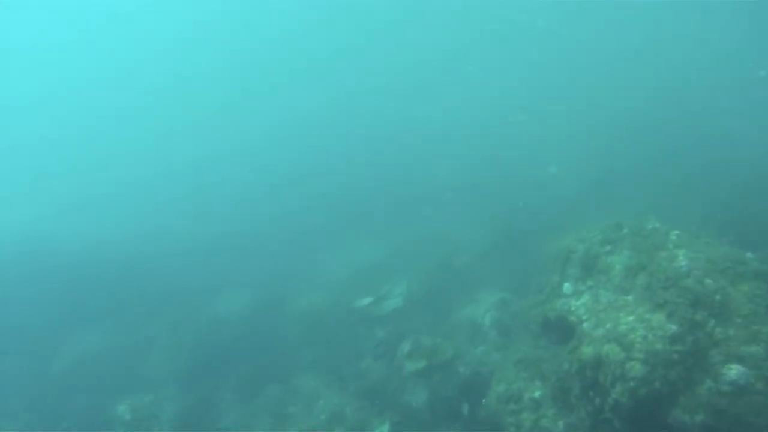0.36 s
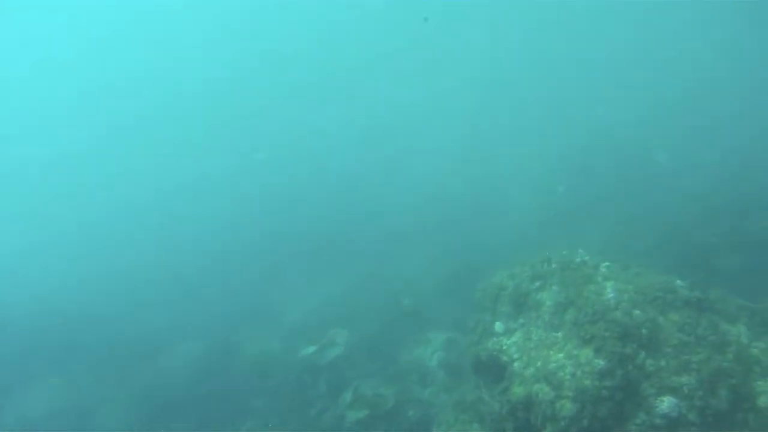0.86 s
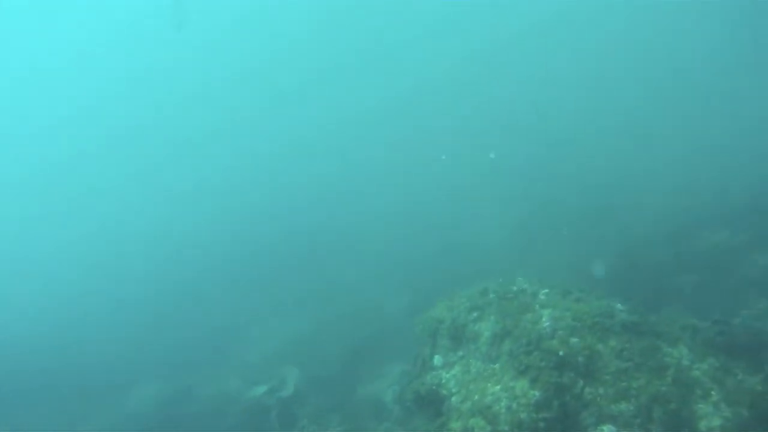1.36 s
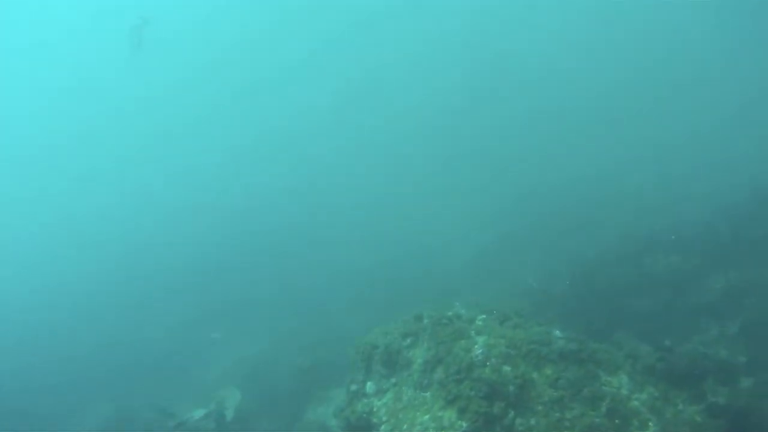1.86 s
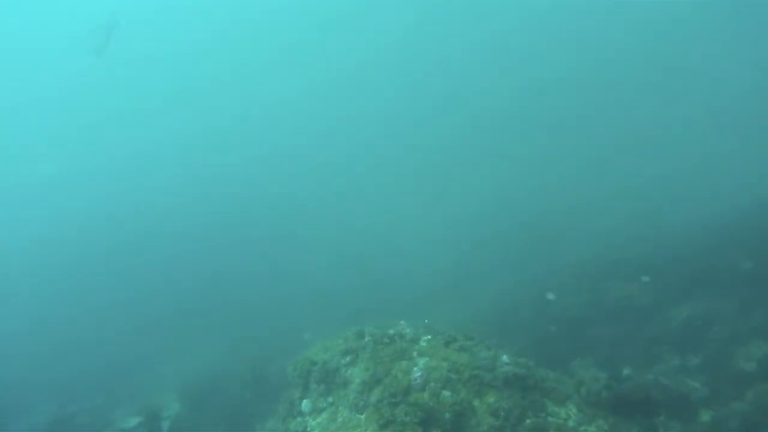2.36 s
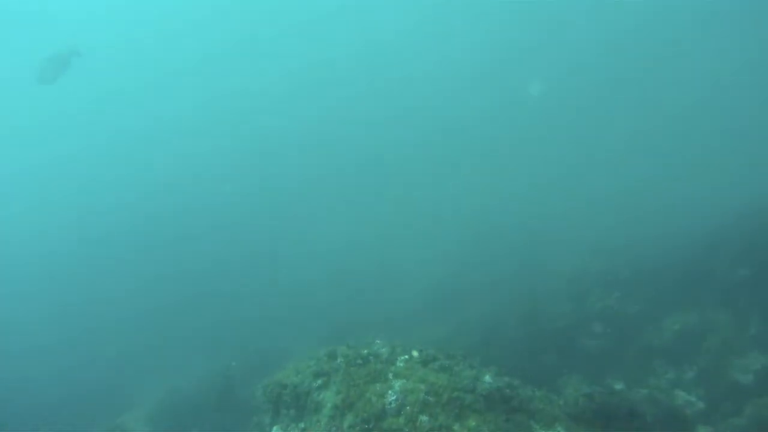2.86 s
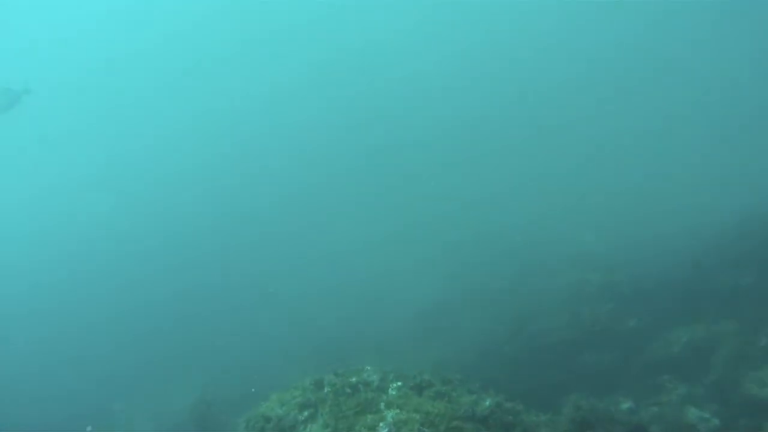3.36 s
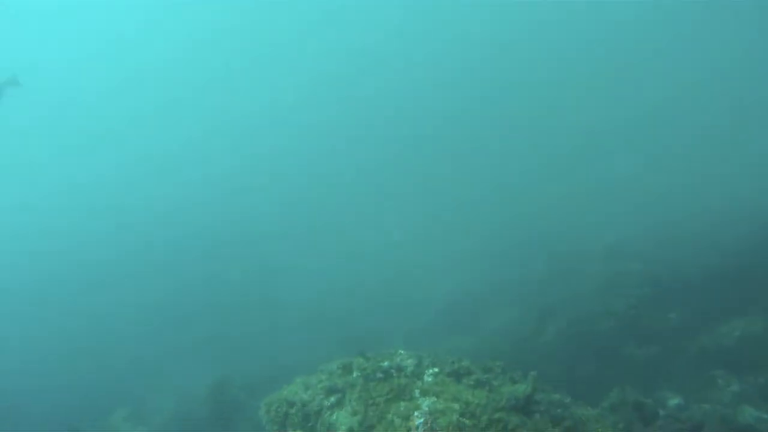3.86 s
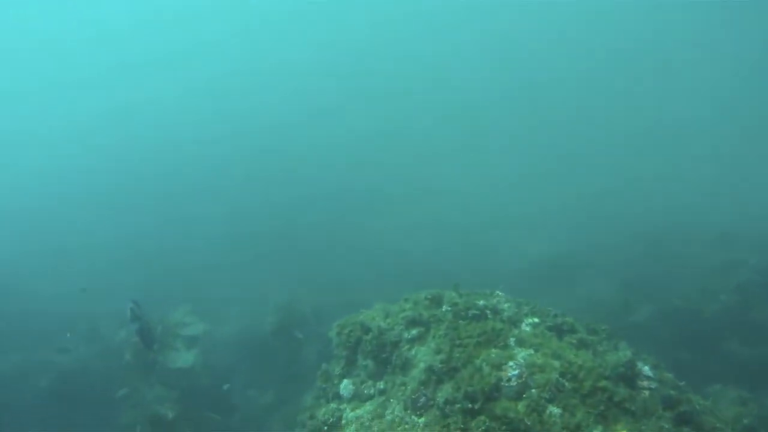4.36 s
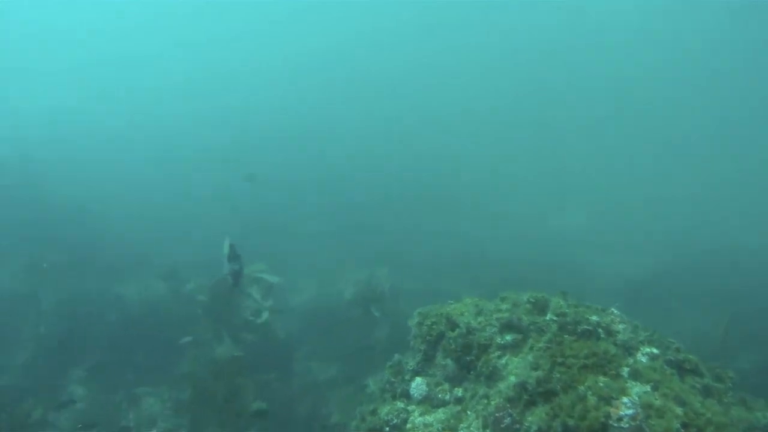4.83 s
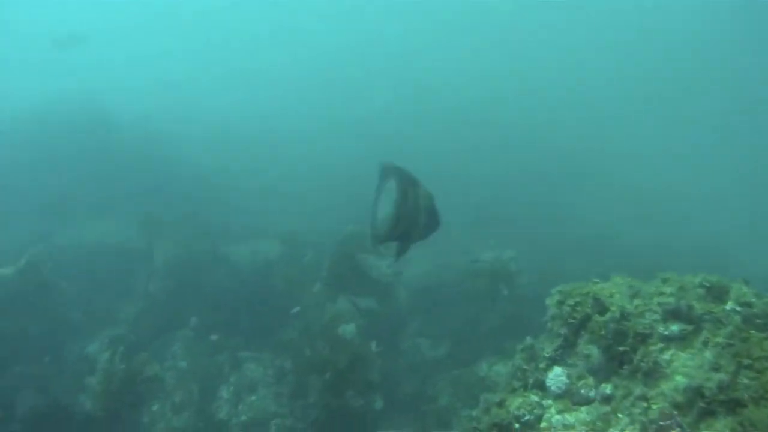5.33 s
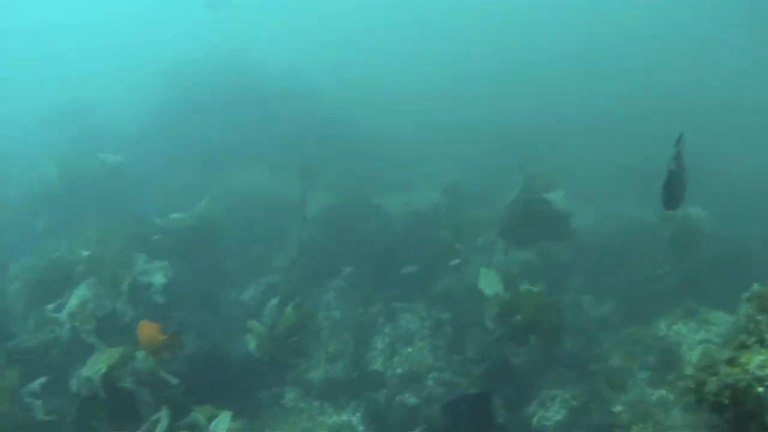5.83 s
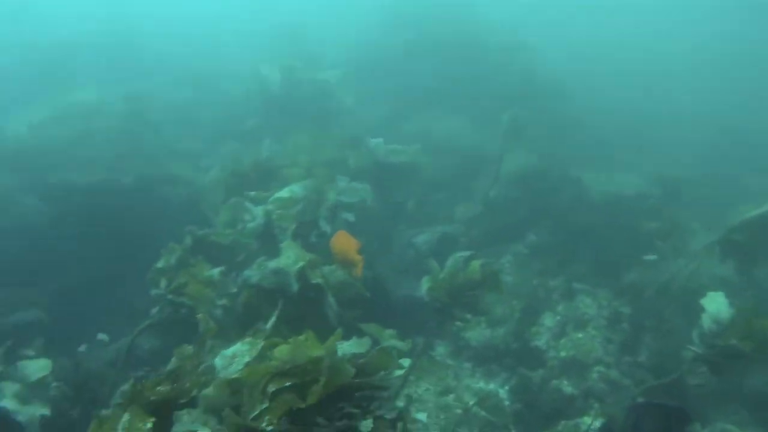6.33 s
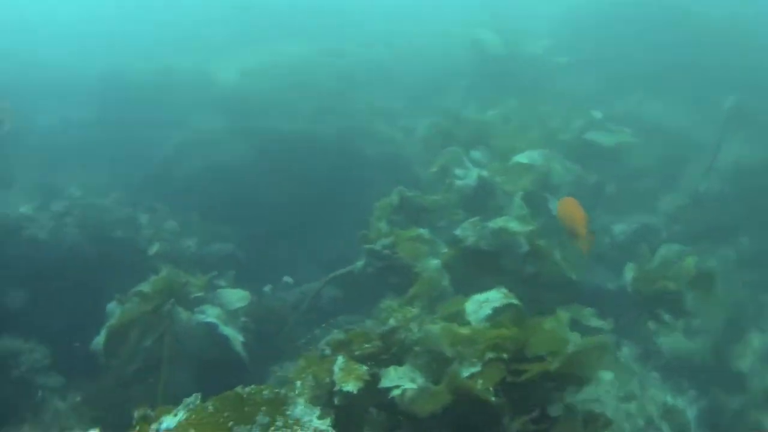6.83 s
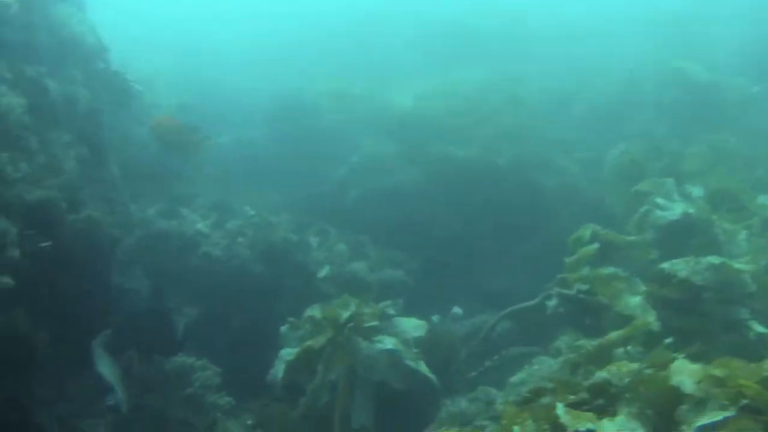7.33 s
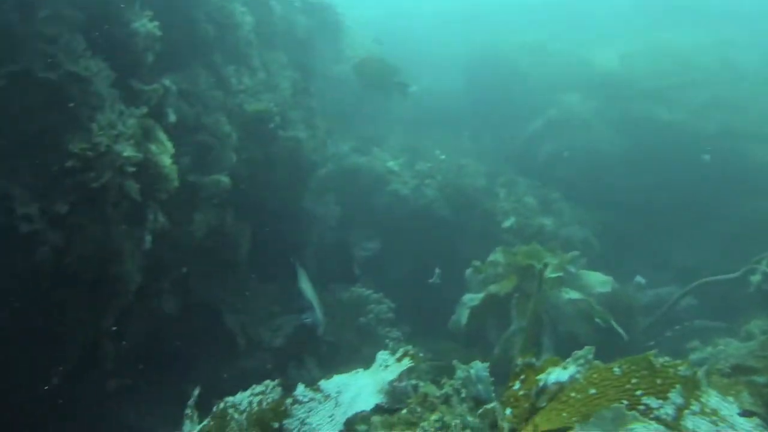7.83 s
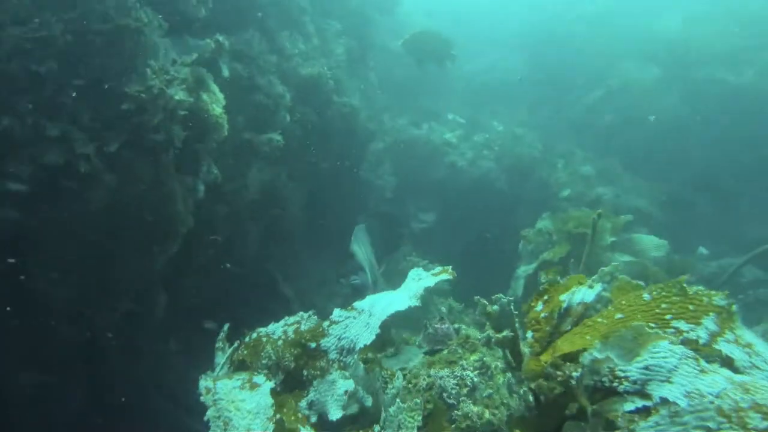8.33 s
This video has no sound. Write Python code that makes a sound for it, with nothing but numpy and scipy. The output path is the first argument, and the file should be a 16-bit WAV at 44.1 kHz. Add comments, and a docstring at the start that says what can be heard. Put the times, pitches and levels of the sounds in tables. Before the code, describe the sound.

A mono microphone inside a sealed underwater housing picks up dense reef crackle: irregular brittle snaps close by, many weaker ones behind, merging into hiss. Faint wash and soft gulping water come and go, with clusters near one and a half, three and five and a half seconds. Little bubbles ring around six seconds. Two main knocks at about seven set off a rapid bubbling burst and a low surge, then crackle continues to the end.

```python
"""Reef crackle inside a sealed housing

Snapping shrimp crackle near and far: each snap is a spike with scattered echoes that rings the housing.
Hard knocks sound damped modes, and the last one shakes loose a gurgling string of bubbles.
Water glugs as damped notes of rising pitch, over shaped noise for the low sway, the wash and the singing.
The camera samples slowly and holds each sample, so the whole scene is mirrored into the treble.
"""
import sys
import numpy as np
from scipy import signal
from scipy.fft import rfft, irfft, next_fast_len
from scipy.io import wavfile
from scipy.ndimage import uniform_filter1d, map_coordinates

SR = 44100
rng = np.random.default_rng(int(sys.argv[2]) if len(sys.argv) > 2 else 0)


def transcribe(u):
    """Save the signal u as a 16-bit wav file named by the first command-line argument.

    u: samples, shape (n,) or (channels, n), limited to [-1, 1]; the rate is SR.
    q: integer samples, one column per channel.
    """
    v = np.clip(np.atleast_2d(u).T, -1, 1)
    q = np.round(v * 32767).astype(np.int16)
    wavfile.write(sys.argv[1], SR, q)


def decibels_to_gain(level_db):
    """Convert a level in decibels to a linear amplitude gain (20 dB per decade)."""
    exponent = np.asarray(level_db, float) / 20
    return 10 ** exponent


N = 383669  # length in samples


def along(points, hz):
    """Reads (Hz, value) points on a log frequency axis."""
    f, v = np.transpose(points)
    return np.interp(np.log(hz + 1), np.log(f + 1), v)


def curves(rows):
    """One value per sample for each column after the time."""
    s, *cols = np.transpose(rows)
    return [np.interp(np.arange(N) / SR, s, c) for c in cols]


def unit(x):
    """Scales to rms 1."""
    return x / np.sqrt(np.mean(x ** 2) + 1e-20)


def wobble(rate):
    """A smooth random curve with rate knots a second."""
    knots = rng.standard_normal(int(N * rate / SR) + 4)
    return map_coordinates(knots, [np.arange(N) * rate / SR])


def coloured(response):
    """Noise of rms 1 with a given frequency response."""
    size = next_fast_len(N)
    spectrum = rfft(rng.standard_normal(size)) * response(np.fft.rfftfreq(size, 1 / SR))
    return unit(irfft(spectrum, size)[:N])


def resonance(f, hz, width_hz):
    """A causal resonance with gain 1 at its centre."""
    return 1j * f * width_hz / (hz ** 2 - f ** 2 + 1j * f * width_hz)


def tight(response):
    """The same colour with all frequencies arriving as early as they can (minimum phase)."""
    cepstrum = irfft(np.log(np.abs(response) + 1e-3))
    half = cepstrum.shape[1] // 2
    # fold the backward half of the cepstrum onto the forward half
    fold = np.r_[1, np.full(half - 1, 2), 1, np.zeros(half - 1)]
    return np.exp(rfft(cepstrum * fold))


def laid(s, grains):
    """Sums rows of grains at their start times."""
    at = np.round(s * SR).astype(int)[:, None] + np.arange(grains.shape[1])
    return np.bincount(at.ravel(), grains.ravel(), N + grains.shape[1])[:N]


# resonances of the housing, lowest first: [f/Hz, width/Hz, level/dB]
HOUSING_MODES = [(730.4, 92, -8), (1161, 136, -6), (1449, 89, -3), (1750, 176, 3), (2054, 517, 0),
                 (2380, 232, 2), (2905, 350, -3.5), (3540, 254, 0), (4280, 660, -8), (5586, 495, -6)]


def housing(f):
    """All the housing's modes, neighbours in opposite phase; the converter's filter cuts below half its rate."""
    modes = sum((-1) ** k * decibels_to_gain(db) * resonance(f, hz, width)
                for k, (hz, width, db) in enumerate(HOUSING_MODES))
    return modes / (1 + (f / 5800) ** 30)


def snaps(s, db, hz, focus, echo_db, echo_t60, size=1024):
    """A claw's bubble collapses: one spike, then scattered echoes off the rocks, ringing the housing."""
    t, f = np.arange(size) / SR, np.fft.rfftfreq(size, 1 / SR)
    chance = rng.standard_normal((len(s), size + 2))
    life = echo_t60 * np.exp(0.3 * chance[:, -1:])
    tail = decibels_to_gain(echo_db + 3 * chance[:, -2:-1] - 60 * t / life)
    # cubed noise: a few strong echoes among many faint ones
    blow = tail * chance[:, :size] ** 3 / np.sqrt(15)
    blow[:, 0] = 1
    # each snap has its own colour: bubble size and path favour one region
    colour = decibels_to_gain(-8) + resonance(f, hz[:, None], hz[:, None] / focus)
    grains = irfft(rfft(blow) * tight(colour * housing(f)), size)
    return laid(s, decibels_to_gain(db)[:, None] * grains / np.abs(grains).max(1, keepdims=True))


# near snaps, the loudest of the crackle: [t/s, peak level/dB, colour f/Hz]
NEAR_SNAPS = [(0.0404, -17.5, 2220), (0.2013, -13.5, 1720), (0.2892, -12, 1980), (0.4567, -16.5, 2210),
              (0.4651, -19.5, 2300), (0.7855, -21, 2140), (0.8515, -13.5, 2410), (0.8656, -17, 2310),
              (0.9053, -7.5, 3700), (1.0257, -18.5, 3480), (1.06, -20, 3020), (1.1604, -24, 1700),
              (1.3843, -7, 2300), (1.4785, -15, 1770), (1.5543, -21, 2430), (1.6904, -16.5, 1650),
              (1.7556, -18.5, 1900), (1.8127, -17.5, 1810), (1.9559, -16.5, 2010), (1.9846, -17, 1800),
              (2.0589, -16.5, 1870), (2.0974, -19, 2850), (2.149, -15.5, 2370), (2.2472, -9, 2100),
              (2.2534, -14, 2290), (2.3022, -17.5, 1860), (2.3991, -3, 2290), (2.4694, -17, 2430),
              (2.5308, -18, 1700), (2.5462, -9.5, 1720), (2.5804, -18, 2200), (2.603, -3.5, 2500),
              (2.6923, -20.5, 1920), (2.749, -22.5, 2220), (2.7816, -16, 1770), (2.8376, -16, 2730),
              (2.8556, -20, 2220), (3.21, -20, 1800), (3.3361, -10.5, 2240), (3.3497, -9, 3600),
              (3.3816, -15, 1830), (3.59, -21, 1750), (3.6931, -14.5, 2320), (3.7017, -17.5, 1770),
              (3.8437, -18, 2140), (3.8811, -10.5, 1650), (3.9659, -17, 3530), (4.0155, -17, 2030),
              (4.074, -12.5, 1750), (4.0941, -6, 2090), (4.1917, -10, 2450), (4.2098, -16.5, 3470),
              (4.2307, -15, 1710), (4.2517, -17, 2370), (4.2925, -11.5, 3410), (4.3474, -17, 1820),
              (4.3567, -6, 2610), (4.423, -14.5, 2120), (4.6018, -13, 3750), (4.7147, -19.5, 1970),
              (4.814, -15.5, 1850), (5.2046, -13, 2060), (5.2497, -15, 1750), (5.3958, -9.5, 3520),
              (5.5225, -11, 2110), (5.5571, -16.5, 1730), (5.6136, -14.5, 1770), (5.6617, -14.5, 2050),
              (5.7813, -16, 1800), (5.8249, 2, 3320), (5.877, -18.5, 1990), (5.9803, -17.5, 1400),
              (5.9984, -13, 1840), (6.127, -27, 2460), (6.3295, -21.5, 1930), (6.3724, -17.5, 1340),
              (6.4342, -23.5, 1980), (6.6665, -17, 2510), (6.7191, -23, 1880), (6.7785, -16, 1860),
              (6.99, -13, 1440), (7.117, -15.5, 1770), (7.323, -18.5, 1820), (7.443, -16.5, 3490),
              (7.5062, -20, 1990), (7.5403, -21, 1850), (7.5679, -19.5, 1830), (7.615, -21, 2380),
              (7.7265, -16, 2160), (7.8057, -17, 1790), (7.8678, -14.5, 2180), (8.0601, -16.5, 1900),
              (8.3708, -13, 1920), (8.4542, -21, 3390)]
# fader for the far reef, ahead of its snap and hiss trims: [t/s, level/dB]
FAR_REEF = [(0.0, -40), (1.5, -39.5), (2.7, -40.5), (3.2, -39.5), (4.3, -40), (5.0, -41), (5.8, -39),
            (7.2, -40), (8.7, -41)]


def shrimp():
    """Near snaps one by one, many weaker ones at random, and the farthest merged into a hiss."""
    s, db, hz = np.transpose(NEAR_SNAPS)
    # the louder, the nearer: less echo against the spike
    near = snaps(s, db, hz, focus=0.77, echo_db=-21 - 0.2 * db[:, None], echo_t60=0.025)
    u = rng.random((2300, 3))
    far_db = np.minimum(-5.5 * np.log(u[:, 1]), 17)  # few loud, many faint
    far_hz = 1100 * 4.82 ** u[:, 2]
    far = snaps(u[:, 0] * N / SR, far_db, far_hz, focus=4.3, echo_db=-18.5, echo_t60=0.014)
    hiss = coloured(housing) * decibels_to_gain(3.42 * wobble(40))
    return near + decibels_to_gain(curves(FAR_REEF)[0]) * (decibels_to_gain(-1.0) * unit(far) + decibels_to_gain(-5.5) * hiss)


def bubbles(s, db, hz, t60, rise, noisy):
    """Damped notes with a soft start and a rising pitch, roughened by the water."""
    t = np.arange(SR // 8) / SR
    age = t / t60[:, None]
    turns = hz[:, None] * t * (1 + rise * age)
    shape = decibels_to_gain(-60 * age) * (1 - np.exp(-(turns / 0.51) ** 2))
    rough = 1 + noisy * unit(uniform_filter1d(rng.standard_normal(age.shape), size=60, axis=1))
    grains = shape * rough * np.sin(2 * np.pi * turns)
    start = np.maximum(s - 0.75 / hz, 0)  # s falls near an early crest
    return laid(start, decibels_to_gain(db)[:, None] * grains / np.abs(grains).max(1, keepdims=True))


# water glugs against the housing: [t/s, peak level/dB, starting f/Hz]
GLUGS = [(0.378, -37, 224), (1.186, -34, 141), (1.443, -34.5, 163), (1.525, -20.5, 575),
         (1.527, -28.5, 296), (1.638, -28, 494), (1.64, -22, 290), (1.647, -24.5, 330), (1.766, -33, 134),
         (3.123, -29.5, 263), (3.224, -26, 660), (3.224, -30, 202), (3.385, -37.5, 152),
         (4.109, -36.5, 130), (4.236, -35.5, 166), (4.296, -34, 170), (4.394, -32, 163), (5.1, -39, 257),
         (5.149, -38, 143), (5.258, -33.5, 158), (5.468, -33, 168), (5.576, -31, 152), (5.639, -25.5, 453),
         (5.645, -27, 150), (5.66, -27, 300), (5.663, -23.5, 580), (5.372, -31.5, 610), (6.49, -37, 124),
         (6.772, -29, 170), (6.931, -33, 175), (7.284, -35, 149), (7.353, -31, 660), (7.361, -30, 600),
         (7.357, -33, 245), (8.462, -36.5, 132)]
# clear bubbles that ring on: [t/s, peak level/dB, starting f/Hz]
RINGING_BUBBLES = [(4.652, -41, 620), (5.946, -43, 470), (5.965, -35.5, 593), (5.985, -40, 740),
                   (6.27, -41, 782), (6.32, -37.5, 754), (6.495, -31.5, 764), (6.862, -38, 372),
                   (7.95, -43, 634)]
# hard knocks on the housing, each adding its level to every knock mode: [t/s, level/dB]
KNOCKS = [(7.000, -10.5), (7.019, -22), (7.102, -5.5)]
# what a knock rings with: [starting f/Hz, level against the knock/dB, t60/s]
KNOCK_MODES = [(770, -24, 0.11), (1130, -9, 0.055), (1400, 0.6, 0.022), (2030, -8.5, 0.019),
               (2540, -14, 0.008)]


def thumps():
    """Single glugs, rounded and a little rough; ringing bubbles; knocks that sound all the modes at once."""
    s, db, hz = np.transpose(GLUGS)
    glugs = bubbles(s, db, hz, 8.5 / hz, rise=0.1, noisy=0.34)  # 60 dB down in 8.5 cycles of starting pitch
    s, db, hz = np.transpose(RINGING_BUBBLES)
    ringing = bubbles(s, db, hz, np.full(len(s), 0.12), rise=0.08, noisy=0.15)
    modes = [(s, db + level, hz, t60) for s, db in KNOCKS for hz, level, t60 in KNOCK_MODES]
    return glugs + ringing + bubbles(*np.transpose(modes), rise=0.05, noisy=0.25)


def gurgle():
    """Air shaken loose by the last knock: a fast string of bubbles swells, holds and dies away."""
    level_db, rise_s, hold_s, fall_db_per_s = -28, 0.012, 0.13, 150
    u = rng.random((90, 3))
    start = KNOCKS[-1][0]
    hz = 110 * 11 ** u[:, 1] ** 1.335
    string = bubbles(start + 0.23 * u[:, 0], -9 * u[:, 2], hz, 14 / hz, rise=0.24, noisy=0.41)
    age = np.arange(N) / SR - start
    fade_db = fall_db_per_s * np.maximum(age - hold_s, 0)
    swell = decibels_to_gain(level_db - fade_db) * np.clip(age / rise_s, 0, 1)
    # the loudest bubbles leave the vent one after another, each weaker than the last
    after_s, gap_s, jitter_s = 0.022, 0.019, 0.00118
    first_db, loss_db, cycles = -17.5, 1.1, 33
    k, chance = np.arange(7), rng.standard_normal((7, 2))
    hz = 705 * (1 + 0.071 * chance[:, 0])
    s = start + after_s + gap_s * k + jitter_s * chance[:, 1]
    vent = bubbles(s, first_db - loss_db * k, hz, cycles / hz, rise=0.078, noisy=0.59)
    return swell * string + vent


# water round the housing, faders ahead of the random flutter: [t/s, sway level/dB, wash level/dB, singing level/dB]
FLOW = [(0.0, -56, -56, -60), (0.41, -60, -60, -61.5), (3.37, -57.5, -54.5, -56), (4.04, -49, -56.5, -69),
        (4.45, -44, -57, -59), (4.55, -55, -56.5, -66), (5.21, -60.5, -60, -52.5),
        (5.91, -53.5, -55.5, -53.5), (6.78, -51, -54.5, -53), (7.1, -39.5, -46, -52), (7.2, -51, -51, -56),
        (7.29, -34, -52, -63), (7.49, -43.5, -57, -62.5), (8.14, -60, -59.5, -57), (8.58, -54, -57.5, -70),
        (8.7, -63, -57, -66)]
# relative spectrum of the wash noise: [f/Hz, level/dB per Hz]
WASH_SPECTRUM = [(50, -28), (90, -5), (145, -3), (200, -9.5), (263, -4.5), (400, -12), (550, -8),
                 (900, -40), (1300, 3), (2500, -80)]
# relative spectrum of the sway noise: [f/Hz, level/dB per Hz]
SWAY_SPECTRUM = [(15, -40), (28, -7.5), (44, -2.5), (60, -13.5), (90, -19), (200, -49.5)]


def water():
    """The housing sways at its low resonance; lumpy flow and small glugs wash over it and sing in its lowest mode."""
    sway_db, wash_db, sing_db = curves(FLOW)
    lumps = decibels_to_gain(3 * wobble(25))
    sway = decibels_to_gain(sway_db + 0.75 * wobble(8)) * coloured(lambda f: decibels_to_gain(along(SWAY_SPECTRUM, f)))
    wash = lumps * coloured(lambda f: decibels_to_gain(along(WASH_SPECTRUM, f)))
    u = rng.random((300, 3))
    hz = 110 * 5 ** u[:, 1] ** 1.35
    glugs = bubbles(u[:, 0] * N / SR, 6 * u[:, 2], hz, 11 / hz, rise=0.23, noisy=0.28)
    hz, width, _ = HOUSING_MODES[0]
    flicker_db = 4.5 * wobble(15)
    sing = decibels_to_gain(sing_db + flicker_db) * coloured(lambda f: resonance(f, hz, 1.87 * width))
    return sway + sing + decibels_to_gain(wash_db) * (wash + decibels_to_gain(-5) * unit(glugs))


def scene():
    """Everything reaches one microphone inside the housing."""
    return (shrimp() + thumps() + gurgle() + water())[None]


# the treble edge: [f/Hz, level/dB]
TREBLE_EDGE = [(15050, 0.5), (15300, -14), (15500, -14), (16500, -31)]


def sample_and_hold(x):
    """Slow sampling, each value held for four ticks, leaves mirror images round the sampling rate."""
    hold_hz = 12000
    slow = signal.resample_poly(x, hold_hz, SR, axis=1)
    held = np.repeat(slow, 4, axis=1)
    return signal.resample_poly(held, SR, 4 * hold_hz, axis=1)[:, :N]


def saturate(x):
    """The input stage saturates near full scale, bending smoothly towards 0.9."""
    return x / (1 + np.abs(x / 0.9) ** 6) ** (1 / 6)


def treble_edge(x):
    """A steep filter: little passes above the top."""
    size = next_fast_len(N)
    gain = decibels_to_gain(along(TREBLE_EDGE, np.fft.rfftfreq(size, 1 / SR)))
    return irfft(rfft(x, size) * gain, size)[:, :N]


def top_cut(x):
    """Nothing passes above the cut-off."""
    return signal.sosfilt(signal.butter(12, 16500, fs=SR, output="sos"), x)


def record(dry):
    """The camera's chain: slow sample and hold, then saturation. After it the treble falls off steeply near 15
    kHz, leaving a faint remainder above."""
    mirrored = sample_and_hold(dry)
    mix = treble_edge(saturate(mirrored))
    return top_cut(mix)


dry = scene()
out = record(dry)
transcribe(out)
```